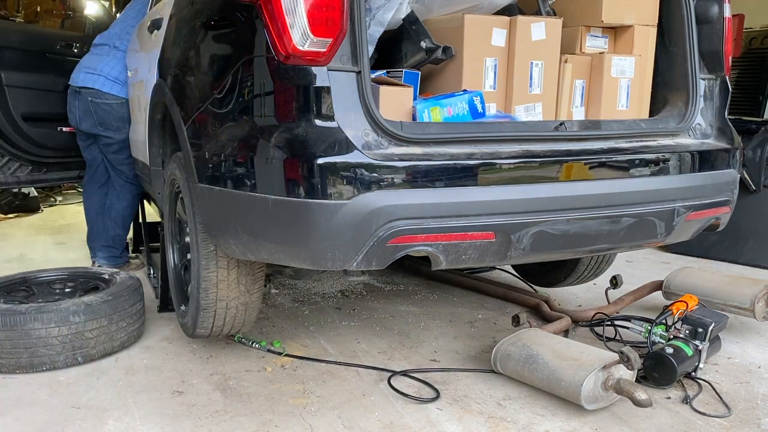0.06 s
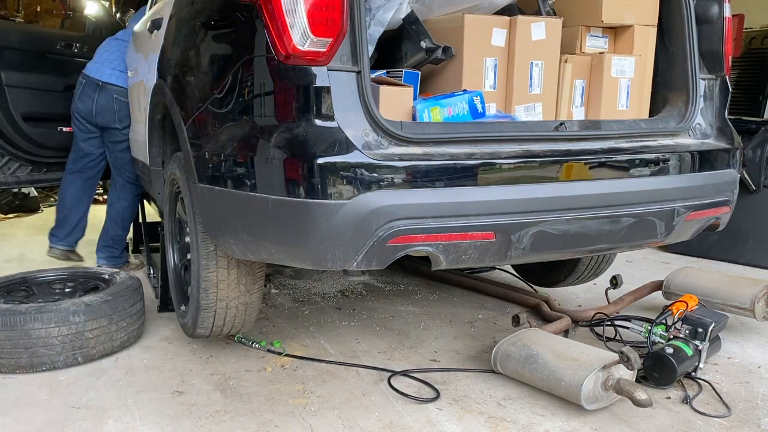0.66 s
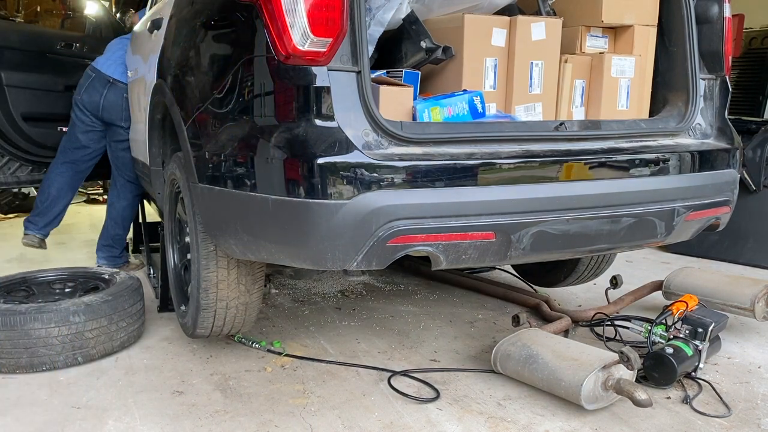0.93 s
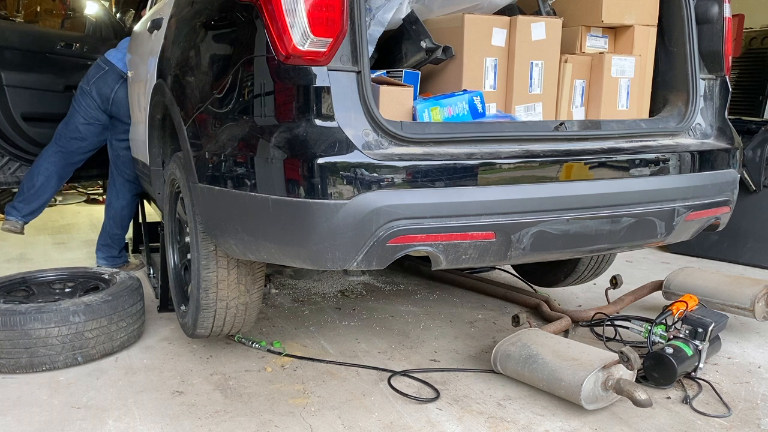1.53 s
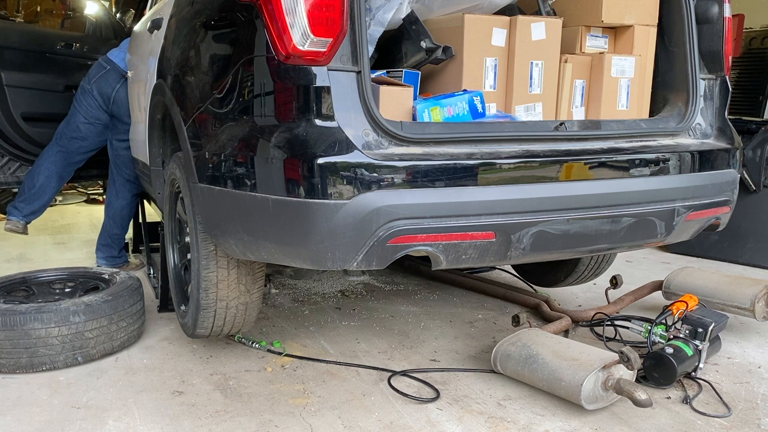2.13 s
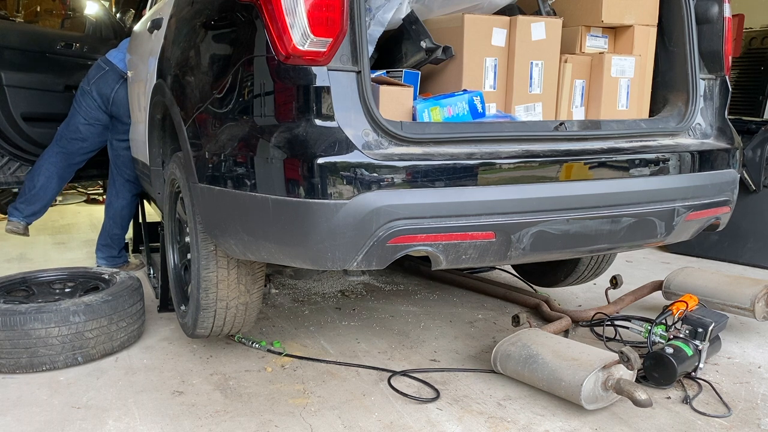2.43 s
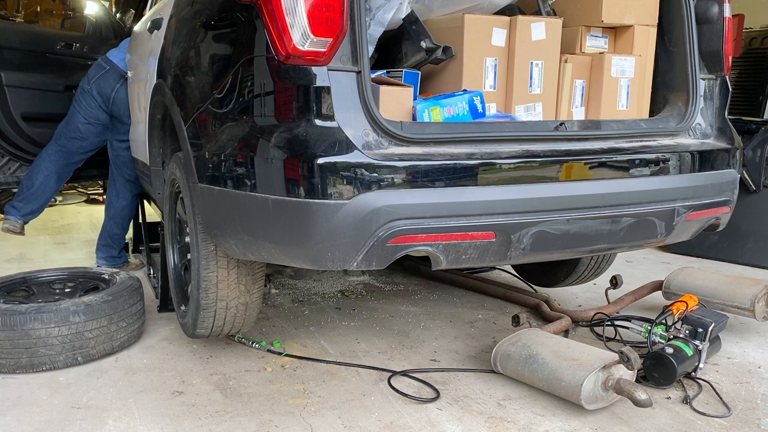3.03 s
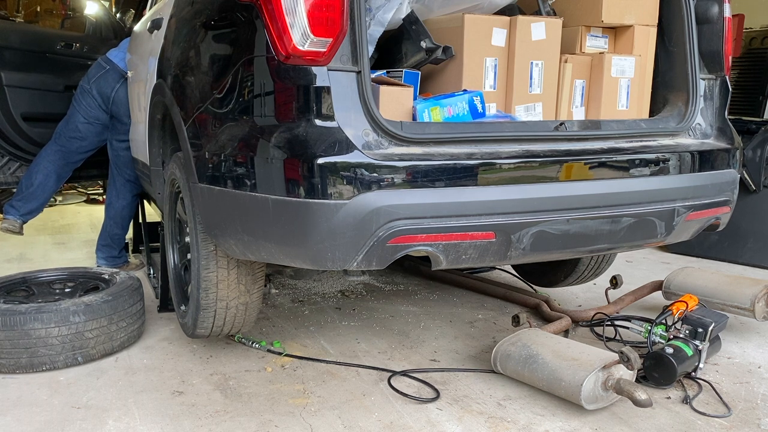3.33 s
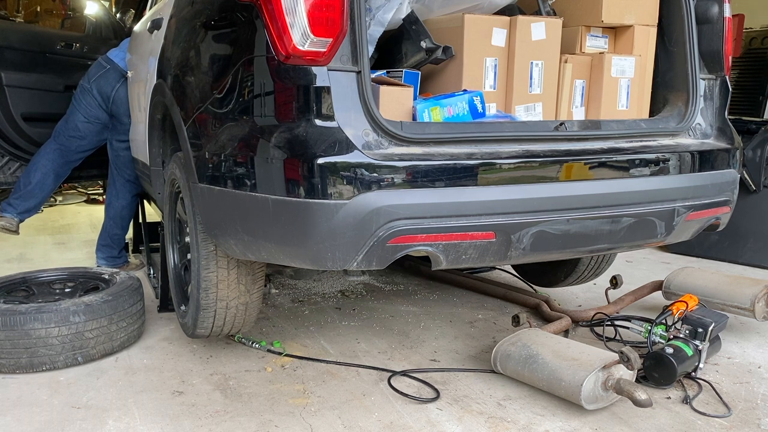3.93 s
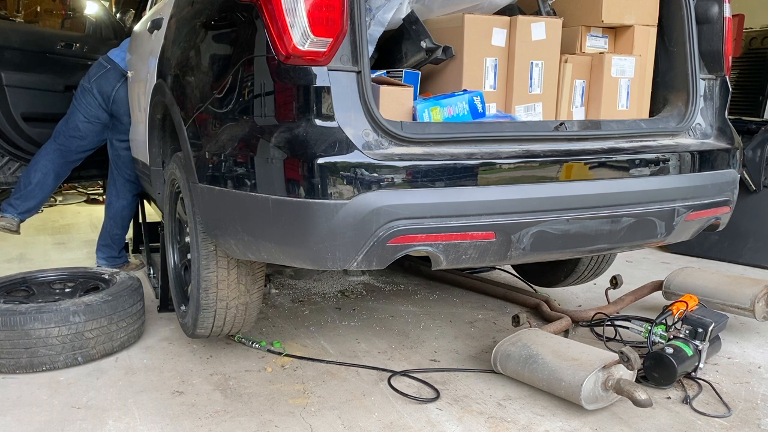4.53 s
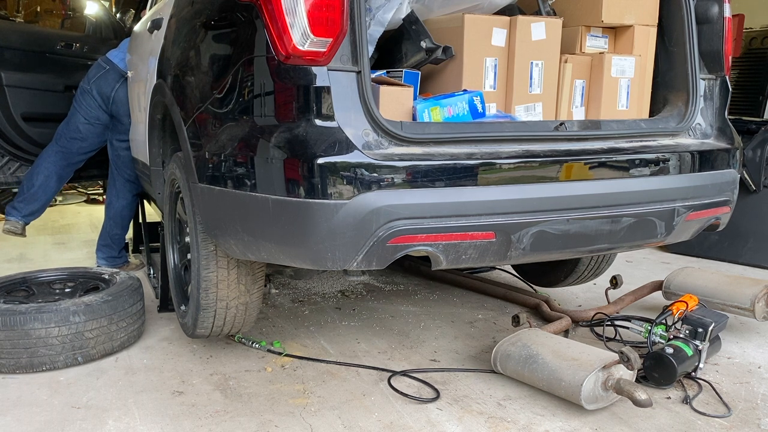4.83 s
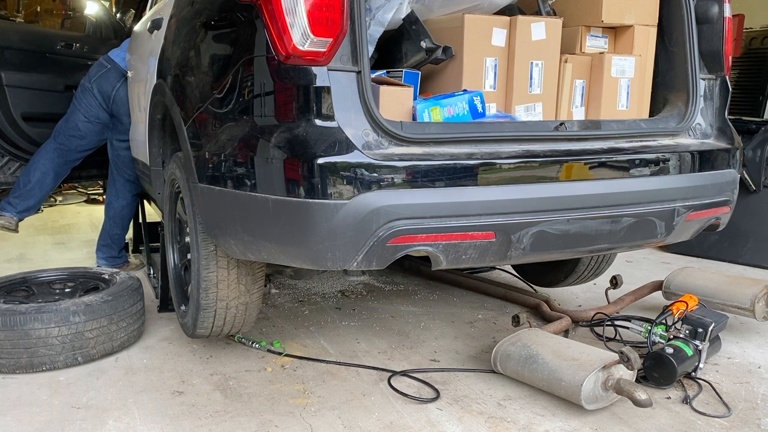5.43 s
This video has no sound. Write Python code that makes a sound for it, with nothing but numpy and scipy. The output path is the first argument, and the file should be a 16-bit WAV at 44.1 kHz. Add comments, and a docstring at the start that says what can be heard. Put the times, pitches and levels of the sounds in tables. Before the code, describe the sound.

A six-cylinder car engine with no silencer idles loudly in a workshop, with a deep pulsing boom, raspy exhaust and a faint metal rattle. About two seconds in it is revved quickly, then burbles and thuds as it stumbles back to idle. A second, higher rev roars near four seconds and burbles down. The microphone is close behind the car and overloads slightly on the revs.

```python
"""A V6 without silencers idles in a workshop: firing pulses boom in the open pipe, gas rasps out with
each one and loose metal rings. At 2.2 s it is blipped; the throttle whistles, the revs climb, then fuel
burbles and thuds in the pipe as the engine slows and stumbles back to idle. At 4.1 s a second, higher
blip roars and burbles down. The microphone, close behind the car, overloads on the revs."""
import sys
import numpy as np
from scipy import signal
from scipy.io import wavfile
from scipy.ndimage import uniform_filter1d

SR = 44100
rng = np.random.default_rng(int(sys.argv[2]) if len(sys.argv) > 2 else 0)


def master_out(mix):
    """Clip the mix to full scale and print it as 16-bit PCM to the path in sys.argv[1]."""
    frames = np.transpose(np.atleast_2d(mix))
    ceiling = np.clip(frames, -1, 1)
    pcm = np.round(ceiling * 32767).astype(np.int16)
    wavfile.write(sys.argv[1], SR, pcm)


N = 249606
TIME = np.arange(N) / SR


def from_db(db):
    """Decibels to gain."""
    return 10 ** (np.asarray(db) / 20)


def rms_one(x):
    """Scale to unit power."""
    return x / np.sqrt(np.mean(x ** 2) + 1e-20)


def in_time(points):
    """Read a time curve at every sample."""
    return np.interp(TIME, *np.transpose(points))


def at_hz(points, hz):
    """Read a curve on a log-frequency axis."""
    points_hz, values = np.transpose(points)
    return np.interp(np.log(hz), np.log(points_hz), values)


def ramp(x, span):
    """Rise from 0 to 1 as x goes from 0 to span."""
    return np.clip(x / span, 0, 1)


def swell(centre_s, sigma_s):
    """Bell curve of height 1."""
    return np.exp(-.5 * ((TIME - centre_s) / sigma_s) ** 2)


def band(x, low_hz, high_hz, order=2):
    """Butterworth band-pass."""
    return signal.sosfilt(signal.butter(order, [low_hz, high_hz], "band", fs=SR, output="sos"), x)


def resonate(x, modes):
    """Parallel resonances (Hz, width in Hz, dB) with alternating signs."""
    out = 0
    for k, (hz, width_hz, db) in enumerate(modes):
        r = np.exp(-np.pi * width_hz / SR)
        b = (1 - r * r) / 2 * np.array([1, 0, -1])
        a = [1, -2 * r * np.cos(2 * np.pi * hz / SR), r * r]
        out = out + (-1) ** k * from_db(db) * signal.lfilter(b, a, x + 1e-18)
    return out


def puffs(sharpness, far_bank):
    """Gas leaves in a puff at each firing, the two banks in turn."""
    swing = np.sin(2 * np.pi * TURNS)
    return rms_one(np.exp(sharpness * swing) + far_bank * np.exp(-sharpness * swing))


def workshop(x, low_hz, high_hz, t60_s=0.27):
    """Diffuse reflections from floor and walls, different at each side."""
    t = TIME[:SR // 2]
    tail = rng.standard_normal((2, len(t))) * from_db(-60 * t / t60_s) * (t > .004)
    tail /= np.sqrt(np.sum(tail ** 2, axis=1, keepdims=True))
    return signal.fftconvolve(band(x, low_hz, high_hz)[None], tail, axes=1)[:, :N]


# Stereo image of the gas noise. Each row: frequency in Hz, left-right correlation.
CORRELATION = [(60, 1), (250, 0.86), (500, 0.29), (1000, 0.34), (2000, 0.34), (4000, 0.17), (8000, 0.14),
               (14000, 0.043)]

def air_noise(spectrum):
    """Stereo noise in half-octave bands, alike in the bass and diffuse in the treble."""
    out, white = 0, rng.standard_normal((2, 2, N))
    edges_hz = 2 ** np.arange(5, 14, .5)
    for k, low_hz in enumerate(edges_hz[(edges_hz * 2 > spectrum[0][0]) & (edges_hz < spectrum[-1][0])]):
        high_hz = low_hz * np.sqrt(2)
        mid, side = band(white[k % 2], low_hz, high_hz)
        centre_hz = np.sqrt(low_hz * high_hz)
        alike = at_hz(CORRELATION, centre_hz)
        stereo = np.sqrt(1 + alike) * mid + np.sqrt(1 - alike) * side * [[1], [-1]]
        out = out + from_db(at_hz(spectrum, centre_hz)) * stereo
    return rms_one(out)


# Throttle whistles. Each row: centre in seconds, sigma in seconds, pitch in Hz, level in dB.
WHISTLES = [(2.199, 0.026, 10560, -35), (4.188, 0.027, 10150, -41.5)]

def throttle_whistle():
    """Air whistles past the throttle as it cracks open, with a weaker upper tone."""
    out = 0
    for centre_s, sigma_s, hz, db in WHISTLES:
        tone = resonate(rng.standard_normal((2, N)), [(hz, 350, 0), (hz * 1.42, 900, -11)])
        out = out + from_db(db) * swell(centre_s, sigma_s) * rms_one(tone)
    return out


# Spectra of the exhaust gas. Each row: frequency in Hz, relative density in dB.
HISS_SPECTRUM = [(300, -12.5), (1500, 1), (4000, -1), (6500, -5), (8000, 10.5), (10000, 0.5), (14500, -4),
                 (16000, -8)]
FLUTTER_SPECTRUM = [(30, -13), (60, 4.5), (110, 7), (190, -3), (280, -9.5), (450, -20), (900, -31.5)]
RASP_SPECTRUM = [(300, -6.5), (600, -6), (1000, 8), (1500, -0.5), (2200, -1.5), (3300, -7), (4500, -7.5),
                 (6300, -18.5), (9000, -30.5), (16000, -43.5)]
JET_SPECTRUM = [(2500, -7), (4300, 1), (5500, 4), (7500, -13), (11000, -29)]

def exhaust_gas(boom_db, rasp_db, idling, hiss_rise_db_per_s=1.22):
    """Gas rasps and hisses in puffs; ragged burning adds a low flutter, a quick rev a bright jet."""
    flutter = from_db(boom_db + 5.5) * UNEVEN * air_noise(FLUTTER_SPECTRUM)
    rasp_puffs = puffs(sharpness=0.62 + 0.22 * OPENING, far_bank=0.83)
    rasp = from_db(rasp_db + 2) * rasp_puffs * air_noise(RASP_SPECTRUM)
    jet_gain = from_db(rasp_db - 2 + (BANK_HZ - 47)) * (1 - idling)
    jet = jet_gain * puffs(sharpness=0.63, far_bank=1) * air_noise(JET_SPECTRUM)
    hiss_db = level_db(idle_db=-51.5, open_db=17, overrun_db=4.5, octave_db=-1.5)
    hiss_db += hiss_rise_db_per_s * TIME
    hiss = from_db(hiss_db) * puffs(sharpness=0.85, far_bank=0.98) * air_noise(HISS_SPECTRUM)
    return flutter + (rasp + jet) * from_db([[1.2], [-1.2]]) + hiss


# Modes of loose metal on the pipe. Each row: frequency in Hz, width in Hz, gain in dB.
METAL_MODES = [(1490, 93, 2.5), (1740, 350, -6.5), (2304, 350, -3.5), (2573, 100, -1.5), (3390, 140, 0),
               (3430, 35, -9.5), (3820, 90, -13), (4250, 100, -5.5)]

def rattle(boom, contacts_per_s=22, spread_db=3):
    """The boom shakes loose metal, mostly as a pulse passes; each contact rings one mode."""
    out = 0
    chance = contacts_per_s * puffs(sharpness=1.3, far_bank=0.84) / SR
    for mode in METAL_MODES:
        sizes = from_db(spread_db * np.minimum(rng.exponential(1, N), 2)) * rng.choice([-1, 1], N)
        out = out + resonate((rng.random(N) < chance) * sizes, [mode])
    shake_db = level_db(idle_db=-37.5, open_db=27.5, overrun_db=5, octave_db=-7)
    return from_db(shake_db) * uniform_filter1d(np.abs(boom), size=SR // 10) * rms_one(out)


# Hard contacts of the metal. Each row: start in seconds, relative peak in dB, pitch in Hz.
TICKS = [(1.1136, -34, 1470), (1.4167, -29.5, 1463), (1.5467, -39, 3330), (1.711, -31, 1730),
         (1.7453, -35, 3480), (2.061, -38, 3500), (2.3152, -21, 3480), (2.3644, -14, 3400),
         (4.2674, -13.5, 3880), (4.2874, -18.5, 3500), (4.51, -36, 1360)]

def ticks(chatter_s=0.005, focus_db_per_octave=19.5):
    """A hard contact chatters briefly and rings the modes near its own pitch."""
    out, t = np.zeros(N), TIME[:SR // 10]
    for start_s, peak_db, pitch_hz in TICKS:
        modes = [(hz, width_hz, db - focus_db_per_octave * abs(np.log2(hz / pitch_hz)))
                 for hz, width_hz, db in METAL_MODES]
        tick = resonate(rng.standard_normal(len(t)) * np.exp(-t / chatter_s), modes)
        at = round(start_s * SR)
        out[at:at + len(t)] += from_db(peak_db) * tick / np.abs(tick).max()
    return out


# Late burns. Each row: start in seconds, level in dB.
THUDS = [(2.948, -10.5), (3.008, -6.5), (3.093, -5.5), (3.433, -10.5), (4.187, -2.5), (5.025, -5.5)]

def thuds():
    """Unburnt fuel goes off in the pipe and briefly rings its low resonances."""
    clicks = np.zeros(N)
    for start_s, db in THUDS:
        clicks[round(start_s * SR)] = from_db(db)
    ring = resonate(clicks, [(136, 40, -4.5), (227, 43, -5)])
    return ring / np.abs(ring).max() * clicks.max()


def shocks(blare_db, knee_db=-20):
    """Strong pulses steepen into shocks in the pipe, growing with pressure squared up to the knee."""
    clicks = np.diff(np.floor(TURNS + 0.16), prepend=0) * from_db(2 * np.minimum(blare_db - knee_db, 0))
    shock = resonate(clicks, [(665, 180, 2.5)]) - resonate(clicks, [(2500, 5700, -27.5)])
    return -shock / np.abs(shock).max()


# Crank speed. Each row: time in seconds, firing rate of one bank in Hz.
BANK_SPEED = [(0.0, 30.47), (0.65, 29.44), (1.25, 29.84), (1.65, 30.33), (2.18, 29.48), (2.3, 41.19),
              (2.45, 40.7), (2.87, 40.11), (3.31, 30.27), (3.64, 33.26), (4.19, 33.0), (4.28, 46.16),
              (4.39, 51.06), (4.53, 47.52), (4.74, 47.51), (4.93, 45.57), (5.39, 34.41), (5.66, 34.47)]
# Pedal blips. Each row: press time, release time, shutting duration, time the idle catches, in seconds.
BLIPS = [(2.184, 2.379, 0.23, 3.282), (4.148, 4.356, .19, 5.36)]

def engine(open_s=0.12, coast_onset_s=0.16, catch_s=0.098):
    """Each blip opens and shuts the throttle; the engine then coasts on overrun until the idle catches."""
    bank_hz = in_time(BANK_SPEED)
    opening = overrun = kick = 0
    for pressed_s, released_s, shut_s, caught_s in BLIPS:
        opening += ramp(TIME - pressed_s, open_s) * (1 - ramp(TIME - released_s, shut_s))
        coasting = ramp(TIME - released_s - 0.51 * shut_s, coast_onset_s)
        overrun += coasting * (1 - ramp(TIME - caught_s, catch_s))
        kick += swell(pressed_s + 0.067, 0.018)   # the first full charges hit hardest
    return bank_hz, opening, overrun, kick


BANK_HZ, OPENING, OVERRUN, KICK = engine()
TURNS = np.cumsum(BANK_HZ) / SR + .75   # one turn per firing of a bank
STUMBLE = OVERRUN * ramp(41.6 - BANK_HZ, 5.7)
UNEVEN = 0.067 + 0.069 * OPENING + 0.15 * OVERRUN + 0.3 * STUMBLE


# Engine effort apart from the blips. Each row: time in seconds, level in dB.
EFFORT = [(0, -1), (.7, -1), (2.1, 1), (3.35, -2.5), (3.8, -0.5), (5.66, -1.24)]

def level_db(idle_db, open_db, overrun_db, octave_db):
    """A voice follows effort and adds its own amounts for throttle, overrun and each octave of speed."""
    octaves = np.log2(BANK_HZ / BANK_HZ[0])
    return in_time(EFFORT) + idle_db + open_db * OPENING + overrun_db * OVERRUN + octave_db * octaves


# Lowest engine order. Each row: firing rate of one bank in Hz, base level in dB.
RUMBLE_BY_SPEED = [(29.8, -50.5), (31, -38.5), (33, -35), (35, -28.5), (39, -21), (41, -24), (47, -26),
                   (51, -36)]

def low_orders():
    """The whole gas column swings smoothly at the firing rates of one bank and of both."""
    rumble_db = at_hz(RUMBLE_BY_SPEED, BANK_HZ) + 6 * OVERRUN
    # Slow coasting starves the firing tone; stumbling brings part of it back.
    starved = OVERRUN * ramp(47.3 - BANK_HZ, 5) * (1 - 0.4 * STUMBLE)
    firing_db = level_db(idle_db=-20.5, open_db=7, overrun_db=1.5, octave_db=7.5) - 13.5 * starved
    rumble = from_db(rumble_db) * np.sin(2 * np.pi * (TURNS + 0.27))
    firing_tone = from_db(firing_db) * np.sin(4 * np.pi * (TURNS + 0.39))
    return np.sqrt(2) * (rumble + firing_tone)


def firings(far_bank, scatter_s):
    """One click per firing, near and far bank in turn; poor combustion scatters strength and timing."""
    count = np.floor(2 * TURNS)
    at = np.flatnonzero(np.diff(count)) + 1
    strength_error, timing_error = UNEVEN[at] * rng.standard_normal((len(at), 2)).T
    scattered_at = np.clip(at + (timing_error * scatter_s * SR).astype(int), 0, N - 1)
    clicks = np.zeros(N)
    clicks[scattered_at] = np.where(count % 2, far_bank, 1)[at] + strength_error
    return rms_one(clicks)


# Air column of the open pipe. Each row: frequency in Hz, width in Hz, gain in dB.
PIPE_MODES = [(116.7, 10, -1), (147.2, 10.9, 9), (170.2, 19, -3), (205.6, 9, -6), (239.1, 15.7, -7.5),
              (287.3, 13.5, -13.5), (331.7, 75, -24), (396.4, 26.3, -18), (448, 28.3, -22.5),
              (524, 50, -23.5), (618, 33, -20), (682.7, 19, -20.5), (816, 33, -24.5), (899, 18, -35)]

def pipe_voice(pulses, low_hz, high_hz):
    """Pulses ring one register of the pipe, swelling whenever a harmonic crosses a resonance."""
    modes = [mode for mode in PIPE_MODES if low_hz < mode[0] < high_hz]
    return rms_one(band(resonate(pulses, modes), low_hz, high_hz, order=4))


# Fuel burbling as the throttle shuts. Each row: centre in seconds, sigma in seconds, strength 0-1.
BURBLES = [(2.57, .075, 0.94), (4.723, 0.11, 0.8)]

def open_pipe(boom_db, idling):
    """Firings and sputter ring the pipe in four registers. Returns the boom alone and the whole pipe."""
    burble = sum(strength * swell(centre_s, sigma_s) for centre_s, sigma_s, strength in BURBLES)
    roar_hz = OPENING * (BANK_HZ - 45.3)   # under throttle the pipe roars with speed
    bark_db = level_db(idle_db=-19.5, open_db=5.5, overrun_db=-1, octave_db=-5)
    bark_db += 5 * KICK + 5.5 * burble - 4 * STUMBLE
    growl_db = level_db(idle_db=-33, open_db=9, overrun_db=-4, octave_db=5)
    growl_db += roar_hz + 10 * burble - 4 * STUMBLE
    blare_db = level_db(idle_db=-40, open_db=16.5, overrun_db=-2.5, octave_db=5.5)
    blare_db += 0.28 * roar_hz + 0.5 * in_time(EFFORT) * (1 - OPENING)
    # At idle both banks sputter alike; under load the near bank gives one cleaner pulse.
    sputter = puffs(sharpness=1.7, far_bank=0.94) * rng.standard_normal(N)
    sputter *= (0.68 + idling) * (1 - 0.2 * burble)
    boom_pulses = firings(far_bank=0.074, scatter_s=0.0034)
    bark_pulses = firings(far_bank=0.18, scatter_s=0.0011) + 0.15 * sputter
    growl_pulses = firings(far_bank=0.31 * idling, scatter_s=0.00074) + 0.5 * sputter
    blare_pulses = firings(far_bank=0.26 * idling, scatter_s=0.0008) + 0.97 * sputter
    boom = from_db(boom_db) * pipe_voice(boom_pulses, low_hz=106.8, high_hz=206)
    bark = from_db(bark_db) * pipe_voice(bark_pulses, low_hz=182, high_hz=344)
    growl = from_db(growl_db) * pipe_voice(growl_pulses, low_hz=309, high_hz=520)
    blare = from_db(blare_db) * pipe_voice(blare_pulses, low_hz=500, high_hz=1110)
    return boom, boom + bark + growl + blare + thuds() + from_db(-2) * shocks(blare_db)


def scene():
    """The crank drives pulses, gas noise and rattle; the room answers."""
    boom_db = level_db(idle_db=-11.5, open_db=0, overrun_db=-9, octave_db=-1.5) + 5 * KICK
    rasp_db = level_db(idle_db=-43, open_db=14, overrun_db=1, octave_db=8)
    idling = ramp(-19 - rasp_db, 16)   # 1 at idle, lower under load
    boom, pipe = open_pipe(boom_db, idling)
    gas = exhaust_gas(boom_db, rasp_db, idling)
    metal = rattle(boom) + from_db(1) * ticks()
    room = from_db(-4.5) * workshop(pipe, low_hz=292, high_hz=6000)
    room += from_db(2.5) * workshop(metal, low_hz=900, high_hz=7000)
    exhaust = (low_orders() + pipe) * from_db([[-.25], [.25]])
    return room + throttle_whistle() + gas + metal * from_db([[1.2], [-1.2]]) + exhaust


# Dips in the microphone's treble. Each row: centre in Hz, width in Hz.
MIC_DIPS = [(8400, 1580), (12100, 3330)]

def record(dry):
    """The microphone flattens the highest peaks, colours the treble and cuts the top."""
    cutoff_hz = 15500
    squashed = dry / (1 + dry ** 16) ** (1 / 16)
    for hz, width_hz in MIC_DIPS:
        squashed = signal.lfilter(*signal.iirnotch(hz, hz / width_hz, fs=SR), squashed)
    return signal.sosfilt(signal.ellip(10, .1, 80, cutoff_hz, fs=SR, output="sos"), squashed)


dry = scene()
out = record(dry)
master_out(out)
```